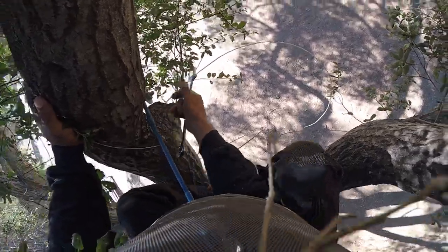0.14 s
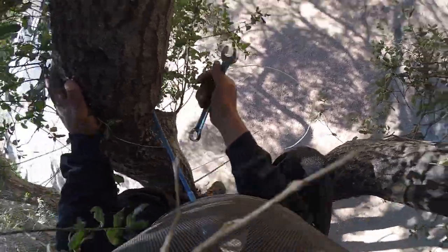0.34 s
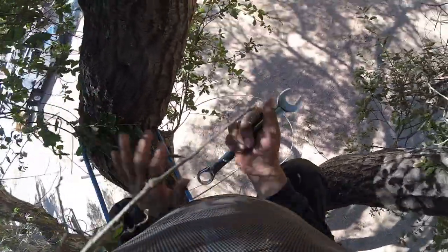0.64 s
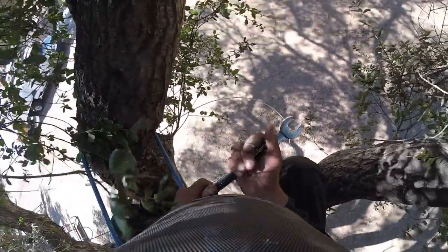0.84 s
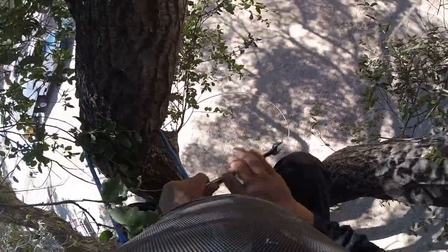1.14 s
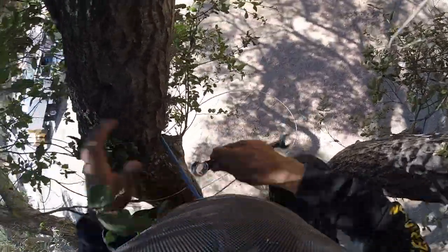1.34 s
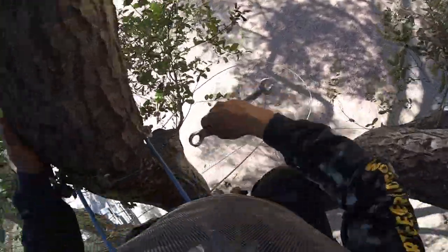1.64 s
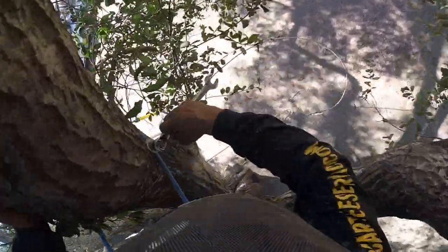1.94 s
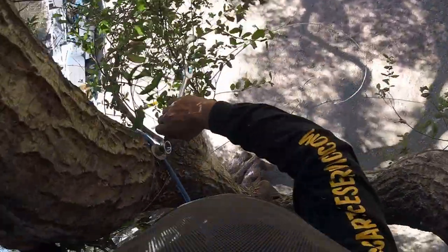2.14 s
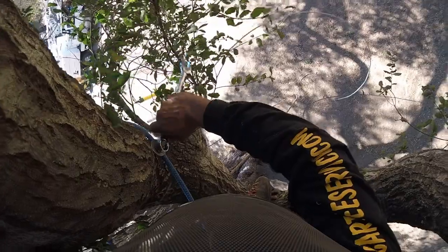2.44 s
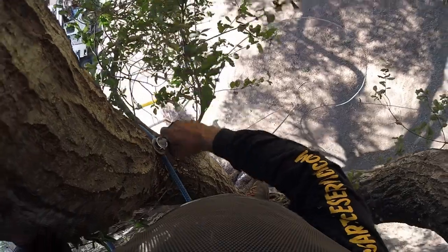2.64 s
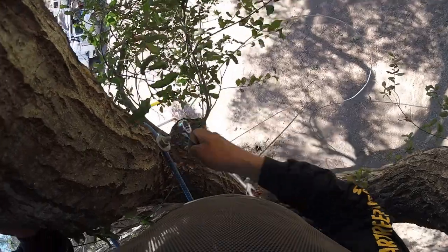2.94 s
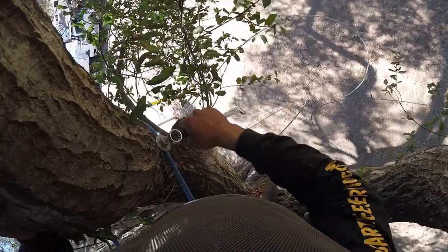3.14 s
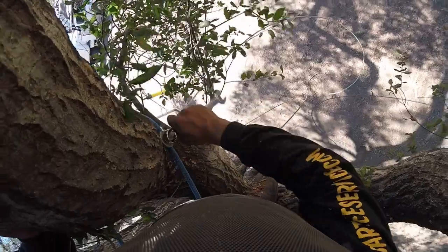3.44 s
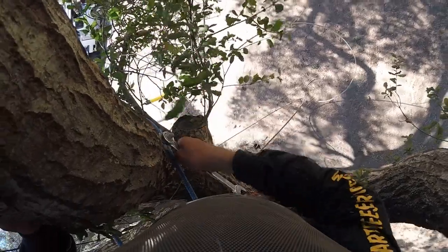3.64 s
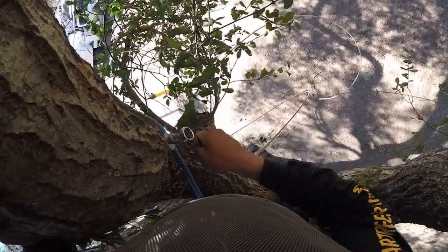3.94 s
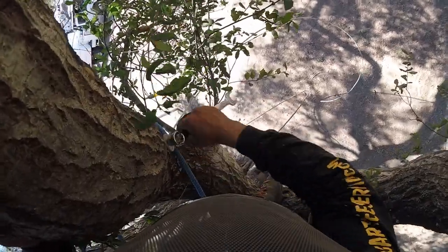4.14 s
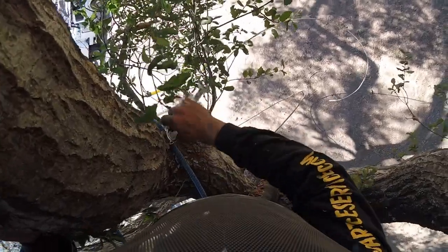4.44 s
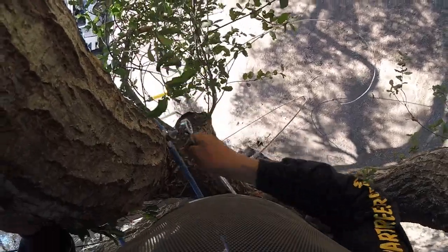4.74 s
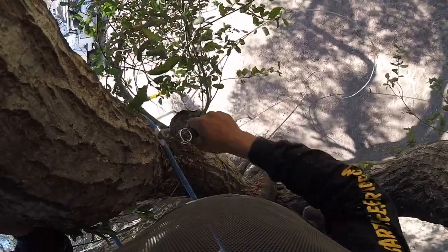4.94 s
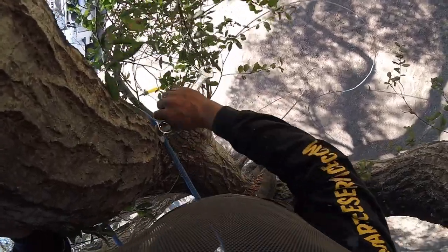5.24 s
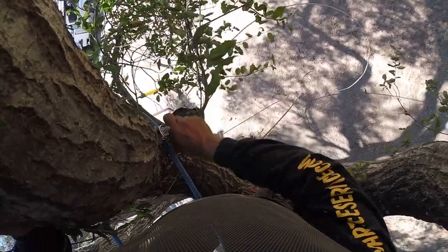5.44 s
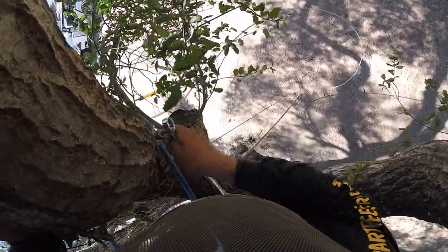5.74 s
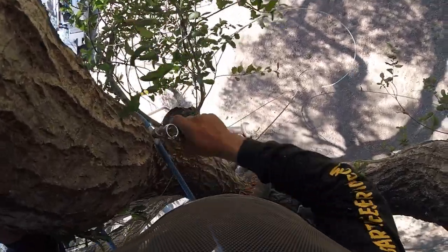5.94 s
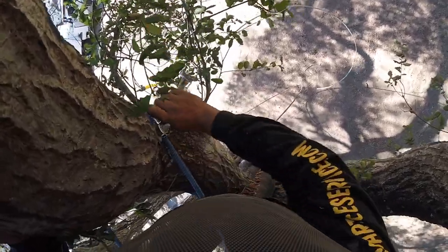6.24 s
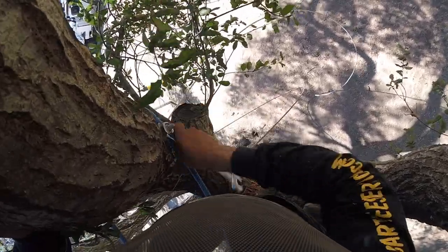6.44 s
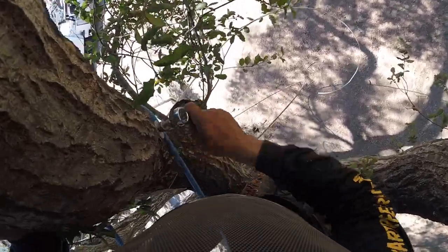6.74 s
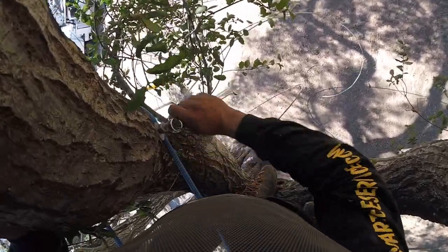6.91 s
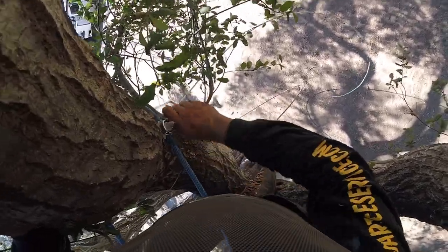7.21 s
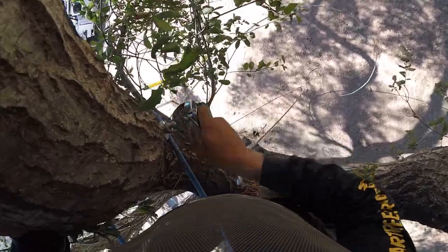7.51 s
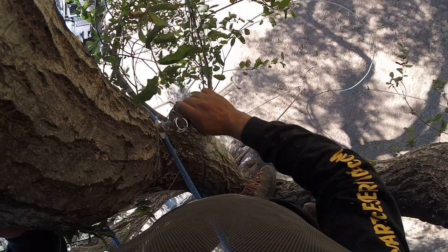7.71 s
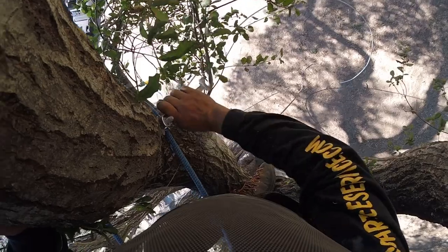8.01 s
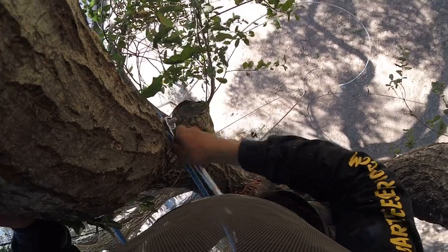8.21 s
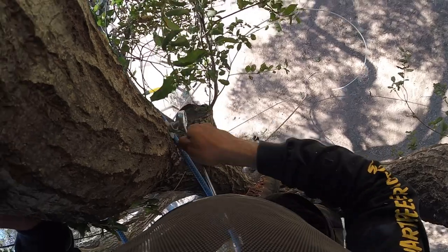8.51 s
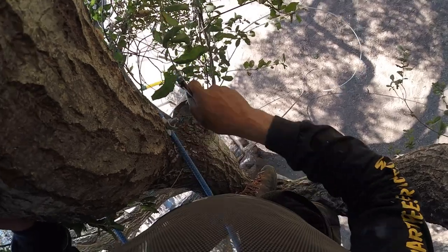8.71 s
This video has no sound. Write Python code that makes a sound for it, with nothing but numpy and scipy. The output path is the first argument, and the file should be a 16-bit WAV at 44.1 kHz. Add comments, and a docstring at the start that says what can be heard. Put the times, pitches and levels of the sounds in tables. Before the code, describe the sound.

Close, dry handling up in a tree: steel ticks first, then twigs and webbing snapping, wood knocking and a low thud. Fabric and rope scuff softly. From around two seconds a spanner clinks and chatters against a bolt in repeating bursts, hard and bright with brief damped rings, small wooden taps beneath. No echo; faint hiss and open air from a chest-worn microphone throughout.

```python
"""High in a tree, a gloved climber turns a steel eye bolt with a spanner, close to a body-worn camera.
The spanner clinks and chatters: bursts of tiny contacts ring its modes. Its free end and the eye sing on.
Snaps are short noise bursts, knocks ring two modes of wood, and bumps are low damped tones.
Cloth, rope and steel rub as noise that swells with each move.
Behind it all lies steady, quiet air and microphone hiss."""
import sys
import numpy as np
from scipy import signal
from scipy.fft import rfft, irfft, next_fast_len
from scipy.io import wavfile
from scipy.ndimage import uniform_filter1d

SR = 44100
rng = np.random.default_rng(int(sys.argv[2]) if len(sys.argv) > 2 else 0)


def digitize_waveform(pressure):
    """Quantize a signal to 16-bit integers and store it at the path in sys.argv[1].

    Rows of a 2-D input are taken as channels; values are limited to [-1, 1].
    """
    field = np.atleast_2d(pressure).T
    bounded = np.clip(field, -1, 1)
    quanta = np.round(bounded * 32767).astype(np.int16)
    wavfile.write(sys.argv[1], SR, quanta)


N = 391166


def clinks():
    """Each blow is a burst of micro-contacts and a looser rattle, ringing the spanner's modes over a broad crack."""
    # steel on steel: (time [s], level [dB], levels of four mode groups, low to high [4 x dB],
    # pitch favoured by the spot struck in each group [4 x Hz], grip's factor on the ring time, chatter time [s])
    steel_blows = [(0.0054, -9, -4.5, -10, -2, -15, 2190, 3600, 5260, 12600, 0.25, 0.004),
                   (0.0147, -9.5, 4.5, -20, -38, -10.5, 2100, 3600, 6500, 10830, 0.18, 0.0025),
                   (0.031, -20, -15, -18, -11, -20, 2190, 4000, 6450, 7000, 0.83, 0.0027),
                   (0.079, -28, -1, -19, -14, -29, 2110, 4150, 5500, 7080, 0.93, 0.002),
                   (1.8535, -29, 3, -11, -31, -28, 2290, 4300, 6280, 7330, 0.75, 0.0071),
                   (1.8724, -31, -4, -9, -30, -31, 2490, 3220, 6360, 9010, 1, 0.0033),
                   (1.9442, -14.5, -4, -16.5, -9, -53, 2236, 3950, 6070, 8080, 0.63, 0.0045),
                   (2.018, -33, -10, 9, -7, -17, 1980, 3950, 6060, 7290, 0.79, 0.0025),
                   (2.041, -7, -14, -8.5, 0.5, -3, 2940, 4180, 5820, 11140, 0.68, 0.0013),
                   (2.187, -15, -9, -10.5, -2, -37.5, 2410, 4250, 6420, 8490, 0.95, 0.0022),
                   (2.1947, -15, -12, -12, -22, -19, 1950, 4250, 6060, 7010, 0.63, 0.0022),
                   (2.4902, -13.5, -10, -10.5, -6, -27, 2480, 4010, 5980, 8530, 0.49, 0.002),
                   (2.7705, -26.5, 7, -29, -28, -18, 2120, 3160, 6370, 7570, 0.19, 0.00098),
                   (2.7873, -26, -1, -5, -22, -31, 2150, 3900, 5980, 7810, 1, 0.0019),
                   (2.7956, -23, 1, -13, -29, -27, 2250, 3930, 6010, 7270, 0.35, 0.0026),
                   (3.2081, -8.5, 3.5, -8, -5.5, -23, 2230, 3720, 5770, 8000, 0.92, 0.002),
                   (3.2191, -8, -26, -10, -9, -18, 2930, 4200, 6050, 8150, 0.4, 0.0017),
                   (3.2414, -35, -13, -17, -8, -26, 2180, 4230, 6400, 8020, 1, 0.0022),
                   (3.2625, -33, -3, -11, -7, -13, 2310, 3750, 5250, 7140, 0.92, 0.0022),
                   (3.277, -11.5, -8.5, -13, -8, -15, 2340, 3280, 6200, 7060, 0.5, 0.0026),
                   (3.3039, -14, -5, -15, -18, -24, 2300, 3960, 6180, 7190, 0.53, 0.0028),
                   (3.3214, -31, -16, -14, -16, -21, 2280, 3230, 6330, 8240, 0.84, 0.0022),
                   (3.453, -30, 17, -2, 3, -3, 2290, 3030, 6020, 8270, 0.89, 0.0022),
                   (3.4828, -9, -8, -22, -11.5, -9.5, 2740, 3820, 6130, 8640, 0.6, 0.002),
                   (3.5093, -9.5, -17, -7, -16, -30, 2210, 4640, 5230, 8260, 0.4, 0.0019),
                   (3.7658, -23.5, 1, -12, -9, -29, 2180, 3140, 5840, 7470, 0.3, 0.0066),
                   (3.7792, -33, 2, -15, -12, -36, 1920, 3130, 6130, 7200, 0.4, 0.0022),
                   (4.025, -10, -9.5, -16.5, -12, -54.5, 2160, 4450, 5960, 8320, 0.75, 0.0027),
                   (4.0308, -10, -33, -7, -7, -33, 2150, 4100, 5860, 8030, 0.47, 0.00069),
                   (4.048, -33, -10, -4, -20, -22, 2200, 4000, 5980, 8010, 1, 0.0028),
                   (4.073, -31.5, 3, -17, -22, -29, 2350, 3000, 6190, 8830, 1, 0.0025),
                   (4.084, -29.5, -2, -16, -20, -29, 2320, 3970, 5990, 7670, 0.9, 0.002),
                   (4.117, -40, -10, -6, -6, -20, 2300, 3900, 6000, 8000, 0.45, 0.0014),
                   (4.124, -28.5, 7, 3, -9, -14, 2830, 3800, 6270, 8390, 0.75, 0.0022),
                   (4.1419, -10, -15, -7, -22, -15, 2350, 3750, 6160, 7630, 0.57, 0.0011),
                   (4.159, -11.5, -3, -11, -6.5, -19, 2330, 3340, 5730, 8090, 0.56, 0.0025),
                   (4.1822, -25.5, -4, -17, -20, -31, 2340, 3840, 5970, 8290, 0.64, 0.002),
                   (4.219, -37, -1, -22, -22, -24, 2210, 3870, 6130, 8280, 0.54, 0.002),
                   (4.3138, -26, 5, -5, -15, -16, 2300, 3970, 6030, 7800, 0.71, 0.0045),
                   (4.326, -5, -3, -15.5, -10, -13, 2460, 3900, 5700, 7870, 0.41, 0.0022),
                   (4.348, -24, -36, -2, -17, -16, 2320, 4680, 6040, 8250, 0.65, 0.0022),
                   (4.511, -41, -11, -12, -18, -27, 2490, 3120, 5710, 8000, 0.91, 0.0027),
                   (4.661, -26, 3.5, -9, -10, -22, 2080, 3140, 6350, 8020, 1, 0.003),
                   (4.688, -18, -16, -11.5, -6.5, -24, 2300, 3750, 6740, 8020, 0.7, 0.0013),
                   (5.0155, -39, -6, -8, -7, -10, 2300, 3900, 6000, 9560, 0.92, 0.0017),
                   (5.0244, -10, -2, -6.5, -17, -12, 2600, 3600, 6440, 7980, 1, 0.0029),
                   (5.0305, -13, 0, -31, -2, -18, 2350, 3730, 6400, 8020, 0.77, 0.0018),
                   (5.048, -28, 1, 2, 6, -9, 2130, 3540, 6300, 8050, 1, 0.0022),
                   (5.08, -13.5, -1, -7, -19, -17, 2330, 4100, 6060, 8050, 0.66, 0.0041),
                   (5.1, -6, -19, -11, -21, -16, 2240, 4070, 6300, 10730, 0.44, 0.0033),
                   (5.124, -23.5, -18, -5, -13, -21, 2150, 3740, 6380, 8290, 0.4, 0.002),
                   (5.1397, -22.5, -1, -8, -18, -34, 2640, 3360, 6100, 7040, 0.68, 0.0016),
                   (5.154, -31, -7, -15, -15, -19, 2750, 3800, 5960, 8180, 1, 0.002),
                   (5.1914, -27, 3, -9, -8, -10, 2200, 3880, 5800, 8460, 0.82, 0.0028),
                   (5.201, -20.5, 2.5, -18, -3, -12, 2300, 3900, 5970, 10560, 1, 0.0018),
                   (5.2082, -18, -13, -19, -18, -26, 2490, 3670, 5700, 8250, 0.46, 0.0014),
                   (5.306, -32, -1, -20, -14.5, -17, 2200, 4150, 6260, 8450, 0.81, 0.0017),
                   (5.374, -23, -6, -5, -11, -17, 2390, 4900, 4950, 7950, 1, 0.0031),
                   (5.382, -19, -4.5, -19, -14, -25, 2420, 3930, 5900, 8250, 0.7, 0.0036),
                   (5.3949, -17.5, -9, -15, -5, -17, 2500, 3600, 6300, 8200, 0.94, 0.002),
                   (5.4178, -20.5, -8, -8, -17, -28, 2900, 4530, 5120, 7060, 0.5, 0.0018),
                   (5.443, -20, -5, -17, -23, -16, 2430, 3150, 6040, 9300, 0.56, 0.0012),
                   (5.551, -32.5, -8, -15, -21, -20, 2190, 3320, 5350, 7060, 0.92, 0.0022),
                   (5.6012, -9, -13, -14, -14, -32, 2920, 3300, 6000, 8520, 0.57, 0.0012),
                   (5.6688, -25.5, 3, -12, -11, -21, 2540, 3930, 5060, 7000, 1, 0.002),
                   (5.6742, -23, 5, 2, 2, -12, 2260, 3080, 5070, 9590, 0.52, 0.0022),
                   (5.698, -10, -6.5, -8, -2, -25, 3000, 3080, 5300, 7530, 0.58, 0.0024),
                   (5.7558, -35, -8, -15, -19, -25, 2210, 2980, 5820, 7430, 0.92, 0.0022),
                   (5.99, -20, 5, -7, -8, -29, 2380, 3770, 6050, 9440, 0.27, 0.0039),
                   (6.012, -34, 10, 16, 7, 6, 2310, 3630, 6000, 8270, 1, 0.0022),
                   (6.039, -8, -32, -15, -15.5, -24.5, 2710, 3544, 5680, 8260, 0.54, 0.0038),
                   (6.0627, -29, -7, -7, -26, -19, 2170, 3770, 5880, 12000, 1, 0.004),
                   (6.0804, -23.5, -12, -7, -13, -25, 2310, 3780, 5930, 8110, 0.63, 0.0021),
                   (6.113, -26, -4, -13, -17, -31, 2340, 3850, 5900, 8430, 0.81, 0.0026),
                   (6.1667, -30, -9, -17, -16, -30, 2130, 4000, 5860, 7070, 1, 0.0022),
                   (6.179, -20, 7, -8, 2, -18, 2320, 3900, 5000, 8090, 1, 0.0036),
                   (6.1906, -6.5, -13, -15.5, -6, -17, 2350, 4030, 6000, 9400, 0.65, 0.0031),
                   (6.212, -29, -5, -11, -22, -15, 2270, 3900, 6030, 8030, 0.78, 0.0022),
                   (6.4656, -16.5, -25, -4, -10, -22, 2130, 3970, 5200, 7540, 1, 0.0089),
                   (6.4717, -7.5, -17, -14.5, -4.5, -21, 2340, 3900, 5910, 8400, 0.51, 0.0022),
                   (6.495, -26, -10, -17, -12, -29, 2120, 3580, 6080, 12600, 1, 0.0025),
                   (6.8706, -9, -9, -7, -22, -30, 2670, 3600, 5170, 7370, 0.84, 0.003),
                   (6.8765, -9.5, -15, -11, -15.5, -33, 2260, 3770, 6170, 8000, 0.51, 0.0025),
                   (6.8924, -24, -14, 0, -18, -35, 2730, 3940, 5530, 8010, 0.6, 0.0022),
                   (6.898, -29, -10, -4, -14, -33, 2730, 3920, 5530, 8010, 0.6, 0.002),
                   (6.916, -38, -20, -2, -22, -33, 2730, 3920, 5530, 8010, 1, 0.0033),
                   (6.9583, -16.5, -15, -7, -17, -28, 2880, 3150, 6050, 8160, 0.35, 0.002),
                   (6.9682, -11.5, -8, -12, -9, -5, 2240, 3290, 6230, 10800, 0.65, 0.0033),
                   (6.9735, -5, -9, -17, -12.5, -21, 2580, 3960, 5900, 9450, 0.28, 0.0017),
                   (6.994, -29, -15, -12, -9, -21, 2670, 3480, 5950, 10500, 1, 0.0022),
                   (7.011, -26.5, -4, -9, -16, -27, 2240, 3270, 6010, 10400, 0.85, 0.0016),
                   (7.021, -42, -10, -10, -10, -7, 2300, 3900, 6000, 10560, 0.6, 0.002),
                   (7.0295, -36, -8, -4, -8, -17, 2480, 3890, 6000, 8140, 1, 0.0018),
                   (7.0436, -7, -7, -19, -6, -6.5, 2340, 3950, 5850, 11500, 0.55, 0.0012),
                   (7.066, -28, -26, 0, -19, -9, 2310, 4770, 5680, 10100, 0.91, 0.0024),
                   (7.281, -44, -12, -6, -23, -17, 2330, 3140, 6340, 8240, 1, 0.0022),
                   (7.3375, -17.5, -9, -14, -14, -19.5, 2350, 3520, 6450, 9600, 0.9, 0.00073),
                   (7.345, -12.5, -23, -8, -13, -24, 2330, 3560, 5370, 8100, 1, 0.0014),
                   (7.363, -22, -7, -13, -16, -31, 2170, 3460, 5730, 8030, 1, 0.0019),
                   (7.7251, -12, -7, -9.5, -12, -28.5, 2790, 3570, 6250, 9400, 1, 0.0043),
                   (7.747, -30, -10, -9, -20, -29, 2620, 3430, 5980, 7150, 1, 0.0022),
                   (7.7961, -10.5, -8, -15.5, -15, -13, 2020, 3720, 6070, 7300, 0.95, 0.0029),
                   (7.8169, -6, -10, -16.5, -17, -13, 2220, 4200, 5900, 8230, 0.31, 0.0032),
                   (7.839, -29, -13, -20, -19, -15, 1950, 3980, 5100, 9000, 1, 0.0024),
                   (7.864, -20, -12, -10, -16, -24, 2170, 4980, 6000, 8180, 1, 0.0034),
                   (7.883, -11, -7, -16, -4, -20, 2320, 4000, 6140, 8180, 1, 0.0026),
                   (7.8926, -9.5, -10.5, -27, -9, -14, 2380, 3980, 5930, 9060, 1, 0.0021),
                   (7.913, -35, -18, -22, -26, 0, 2300, 3760, 6030, 10500, 0.92, 0.0022),
                   (7.936, -41, -15, -17, -10, -17, 2330, 3970, 5370, 7660, 1, 0.0022),
                   (8.2886, -37.5, -3, -3, -21, -21, 2290, 3250, 6070, 7070, 1, 0.002),
                   (8.417, -31, -2, -8, -24, -16, 2320, 3520, 5160, 8330, 1, 0.0025),
                   (8.4253, -22.5, -4, -8, -2, -16, 2760, 3540, 6270, 9600, 0.9, 0.0021),
                   (8.4558, -13, -15, -12, -11, -31.5, 2140, 3440, 5470, 8400, 0.7, 0.0011),
                   (8.47, -30, -21, -11, -17, -21, 2290, 3500, 6300, 8030, 1, 0.0022),
                   (8.4856, -29.5, -13, -7, -13, -28, 2330, 3500, 6360, 8100, 1, 0.0028)]
    # modes of the hand-held spanner: (pitch [Hz], level [dB], time to fall 60 dB before the grip acts [s])
    spanner_modes = [(2166, -17, 0.24), (2322, 0.5, 0.042), (2720, 4.5, 0.015), (3140, 2, 0.034),
                     (3533, 1.5, 0.027), (3800, -8, 0.05), (3962, 4.5, 0.043), (4230, 6.5, 0.017),
                     (4770, -0.5, 0.035), (5270, 12, 0.0053), (6100, 3, 0.044), (6260, -9, 0.067),
                     (7590, -5, 0.023), (8130, -0.5, 0.034), (8890, -2.5, 0.054), (9700, 10.5, 0.015),
                     (10400, 2.5, 0.044), (12640, -4.5, 0.015), (13360, 1, 0.033), (13650, -12, 0.013)]
    # wood round the bolt: (pitch [Hz], level relative to the blow [dB], time to fall 60 dB [s])
    trunk_modes = [(583, -23.5, 0.062), (423, -21.5, 0.033), (905, -1, 0.0036)]
    # upper edges of the three lower mode groups: (pitch [Hz])
    group_tops = [3000, 5000, 7000]
    # centres of the four mode groups: (pitch [Hz])
    group_centres = [2170, 3870, 5700, 8840]
    grip_closes_s, gripped_t60_s = 0.0063, 0.06  # fingers close on the steel soon after a blow
    rattle_db, crack_db = -26.5, -3
    hard_hz, softening = 19100, 0.27  # top of a hard contact; it drops as the top group weakens

    out, t = np.zeros(N), np.arange(3000) / SR
    hz, db, t60 = np.transpose(spanner_modes)
    group = np.searchsorted(group_tops, hz)
    thunk = sum(amp(level - 60 * t / ring_s) * np.sin(2 * np.pi * f * t) for f, level, ring_s in trunk_modes)
    thunk *= 1 - np.exp(-t / 0.00097)
    chances = rng.standard_normal((len(steel_blows), 2, len(hz)))
    noises = rng.standard_normal((len(steel_blows), 3, len(t)))

    for row, (place, detune), (grit, hiss, loose) in zip(steel_blows, chances, noises):
        (s, blow_db), groups_db, favoured, (grip, chatter) = np.split(np.array(row), [2, 6, 10])
        low_db, top_db, loudest_db = groups_db[0], groups_db[-1], max(groups_db)

        # modes far from a favoured pitch are weaker
        distance = abs(np.log2(hz[:, None] / favoured))
        away_octaves = distance.min(axis=1)
        level_db = db + groups_db[group] - np.minimum(80 * away_octaves, 16) + 2.7 * place
        tuned = hz * (1 + 0.0095 * detune)
        tuned[distance.argmin(axis=0)] = favoured  # grip and load bend the nearest mode to it
        decay_db = -60 * t / (np.clip(grip, .2, 6) * t60[:, None])
        decay_db = decay_db - 60 * np.maximum(t - grip_closes_s, 0) / gripped_t60_s
        modes = amp(level_db[:, None] + decay_db) * np.sin(2 * np.pi * tuned[:, None] * t)
        ring = modes.sum(0)

        colour = [(1000, low_db - 6.5), *zip(group_centres, groups_db), (15000, top_db - 34)]
        crack = amp(crack_db + loudest_db - 60 * t / 0.0088) * tinted(hiss, colour)
        crack *= 1 - np.exp(-t / 0.00014)

        contact = 0.17 * grit ** 3 * np.exp(-t / max(chatter, 1e-4))  # cubing makes it spiky
        contact *= 1 - np.exp(-t / 0.00026)  # the edges graze before the full contact
        contact[20] += 1.3  # the full contact
        contact = flattened(contact, 9)  # excites all modes about alike
        contact *= np.exp(-t / max(4 * chatter, 1e-4))
        rebounds = amp(rattle_db) * np.sign(loose) * (abs(loose) > 2.4) * np.exp(-t / 0.016)
        rattle = signal.lfilter([1], [1, -.4], rebounds)  # light rebounds are softer, so duller
        drive = contact / np.linalg.norm(contact) + rattle

        blow = signal.fftconvolve(ring + crack, drive)[:len(t)]
        soft_hz = np.clip(hard_hz * amp(softening * (top_db - loudest_db)), 3000, 20000)
        # a slim bar radiates no bass
        blow = signal.lfilter(*signal.butter(3, [2000, soft_hz], "band", fs=SR), blow)
        add(out, s, amp(blow_db) * (blow / abs(blow).max() + thunk))
    return out


def pings():
    """After some blows the steel swings free, and the spanner's free end rings on in its high modes."""
    # blows that leave it free: (time [s], levels of the six modes [6 x dB])
    free_blows = [(2.0418, -45, -60, -34, -50, -50, -50), (3.2086, -38, -60, -58, -58, -55, -55),
                  (3.2201, -50, -60, -42, -58, -55, -55), (4.029, -34, -66, -70, -70, -70, -70),
                  (4.1584, -32, -60, -58, -58, -50, -50), (4.327, -60, -50, -60, -60, -42, -42),
                  (5.026, -24, -50, -60, -55, -44, -42), (5.032, -60, -60, -48, -60, -55, -50),
                  (5.081, -42, -44, -58, -60, -52, -48), (5.0998, -31, -55, -46, -55, -36, -42),
                  (5.6999, -55, -60, -58, -49, -55, -55), (6.0387, -40, -60, -34, -57, -55, -55),
                  (6.4754, -50, -60, -55, -46, -50, -36), (6.8703, -38, -60, -60, -58, -60, -60),
                  (6.97, -50, -34, -43, -55, -33, -45), (7.0445, -55, -50, -48, -55, -40, -40),
                  (7.7975, -55, -29, -55, -60, -46, -50), (7.818, -40, -55, -40, -60, -39, -48),
                  (7.8935, -55, -55, -55, -50, -44, -23), (8.456, -40, -60, -58, -58, -55, -55)]
    # modes of the free end: (pitch [Hz], time to fall 60 dB [s])
    free_modes = [(8060, 0.047), (9640, 0.051), (12000, 0.089), (12600, .07), (13300, .026), (13800, .025)]
    out = np.zeros(N)
    for (hz, t60), levels in zip(free_modes, np.transpose(free_blows)[1:]):
        table = [(row[0], db, hz, t60) for row, db in zip(free_blows, levels)]
        out += thumps(table, rise_s=0.00064, rough=0)
    return out


def singing():
    """One long-lived mode of the eye, cut short whenever a hand touches it."""
    # the eye set singing: (time [s], level [dB], time to fall 60 dB while free [s], time it rings free [s])
    eye_rings = [(0.017, -18, 0.069, .05), (.04, -51, .5, 0.022), (.078, -45.5, 0.53, .2),
                 (1.95, -60, .6, .07), (2.043, -34, 0.98, 0.052), (2.2, -36.5, .9, 0.026),
                 (2.222, -30.5, 0.13, 0.023), (2.492, -50.5, 0.86, 0.11), (3.21, -35, 0.47, 0.065),
                 (3.279, -30, 0.25, 0.16), (3.77, -47, 0.22, .12), (4.16, -51, .4, 0.045),
                 (4.69, -48, 0.23, .12), (5.102, -54, .9, .1), (5.21, -64, .5, 0.065),
                 (5.42, -60, .2, .015), (5.436, -42, 0.092, .01), (5.604, -58, .3, .03),
                 (5.735, -58, 0.5, .06), (6.042, -51, 0.87, 0.098), (6.473, -42, 0.54, .35),
                 (6.975, -42, 0.34, 0.033), (8.456, -37, 0.26, 0.031)]
    eye_hz, waver_hz = 6530, 11
    rise_s, touched_t60_s = 0.0021, 0.14  # the touch adds its own faster fall

    loudness, t = np.zeros(N), np.arange(SR // 2) / SR
    for s, db, t60, free in eye_rings:
        fall_db = 60 * t / t60 + 60 * np.maximum(t - free, 0) / touched_t60_s
        add(loudness, s, amp(db - fall_db) * (1 - np.exp(-t / rise_s)))
    waver = evened(uniform_filter1d(rng.standard_normal(N), size=4000))  # the load on the bolt shifts
    phase = 2 * np.pi * np.cumsum(eye_hz + waver_hz * waver) / SR
    return np.sqrt(2) * loudness * np.sin(phase)


def knocks():
    """A few gritty contacts in quick succession ring two modes of bark or wood."""
    # dull knocks and short scrapes: (time [s], peak [dB], pitch [Hz], time to fall 60 dB [s],
    # second pitch [Hz], its level relative to the first [dB], scraping time [s])
    wood_knocks = [(0.352, -28.5, 3400, .03, 2700, -8, 0.007), (0.399, -19, 1198, 0.089, 1920, -15, 0.0056),
                   (0.441, -22, 1150, .04, 1800, -13, .004), (0.455, -16, 1060, 0.061, 1790, -2.5, 0.0069),
                   (0.522, -16, 1130, 0.025, 1860, -6.5, 0.013), (0.6, -29.5, 3460, 0.038, 2600, -13, .015),
                   (1.344, -41, 1203, 0.13, 1620, -7, .03), (1.362, -39.5, 3650, 0.075, 3030, -4, 0.017),
                   (1.42, -40, 1105, 0.059, 1720, -8, 0.0087),
                   (1.531, -16.5, 2680, 0.014, 3520, 2.5, 0.0023),
                   (1.552, -28, 1090, 0.096, 3600, -15, .015), (1.744, -18, 1450, 0.044, 3130, -19, 0.0021),
                   (1.816, -33, 1550, 0.043, 2380, -17, 0.0033),
                   (1.886, -29.5, 1355, 0.065, 2410, -5, .008), (1.915, -30, 2420, 0.072, 1410, 7, 0.0059),
                   (1.983, -26.5, 1580, 0.05, 1280, -1, 0.0037),
                   (2.018, -32.5, 1320, 0.13, 1890, -3, 0.0093),
                   (2.106, -30.5, 1580, 0.036, 2620, -10, 0.0043),
                   (2.165, -22.5, 1500, .04, 1180, -4, 0.0044), (2.172, -20.5, 934, 0.069, 1395, 4, 0.01),
                   (2.197, -16.5, 1180, 0.031, 1870, -3, 0.0029),
                   (2.204, -22.5, 534, 0.047, 1290, 1, 0.023),
                   (2.246, -24.5, 1180, 0.068, 1760, -8, 0.0093),
                   (2.27, -18.5, 1240, 0.025, 1680, -4, 0.0044), (2.305, -38, 1250, .06, 1790, -6, .01),
                   (2.324, -32, 1230, 0.044, 1700, -10, .005), (2.41, -31, 596, 0.018, 960, -17, 0.0031),
                   (2.462, -23, 1050, 0.0067, 1870, 2, 0.0033),
                   (2.6199, -16, 1310, 0.044, 1545, -5.5, 0.0028),
                   (3.39, -30, 1175, 0.047, 1760, -5, 0.0081),
                   (3.809, -27.5, 1290, 0.033, 1620, -3, 0.0031),
                   (3.865, -41, 1600, 0.04, 1290, -8, 0.0055), (4.145, -33.5, 750, 0.041, 1210, 7, 0.0057),
                   (4.328, -29, 660, 0.046, 1140, -5, 0.0048), (4.66, -29.5, 562, 0.047, 1250, -9, .006),
                   (4.762, -35.5, 1750, .04, 1400, -6, 0.0074),
                   (4.769, -32, 1216, 0.068, 1820, -15, 0.0062), (4.805, -40.5, 1790, .04, 1300, -2, .008),
                   (5.028, -30, 1000, 0.036, 740, -2, 0.0061), (5.125, -33, 1280, 0.025, 850, -2, 0.0046),
                   (5.14, -28.5, 850, 0.021, 1690, -11, 0.0041),
                   (5.206, -21, 830, 0.016, 1500, -14, 0.0057), (5.386, -29, 1010, 0.016, 1630, -5, 0.0078),
                   (5.42, -33, 1820, 0.027, 705, 5, .005), (5.643, -37, 1570, 0.023, 1100, -6, 0.0034),
                   (5.696, -21, 1330, 0.014, 830, -3.5, 0.0059), (6.195, -33, 686, 0.03, 1110, -9, 0.0097),
                   (6.47, -31, 690, 0.035, 1220, 5, 0.0067), (6.88, -27.5, 780, 0.032, 1280, -2, 0.0077),
                   (7.341, -28.5, 1310, 0.034, 900, -6, 0.0062),
                   (7.726, -32.5, 602, 0.094, 1167, -2, 0.0068),
                   (7.801, -25.5, 1320, 0.021, 960, 1, 0.0046), (7.82, -18.5, 1190, 0.027, 780, -5, 0.0034),
                   (7.89, -25.5, 590, 0.024, 900, -24, .008), (8.456, -24, 814, 0.02, 1410, -5, 0.0041)]
    grit_db = -9

    out, t = np.zeros(N), np.arange(5000) / SR
    grits = rng.standard_normal((len(wood_knocks), len(t)))
    for (s, db, hz, t60, second_hz, second_db, scrape), grit in zip(wood_knocks, grits):
        tones = np.sin(2 * np.pi * hz * t) + amp(second_db) * np.sin(2 * np.pi * second_hz * t)
        ring = tones * amp(-60 * t / max(t60, .005))
        colour = [(0.21 * hz, -24), (hz, 0), (second_hz + hz, -4), (6000, -26)]
        scratch = amp(grit_db - 60 * t / 0.011) * tinted(grit[::-1], colour)

        drive = 0.11 * grit ** 3 * np.exp(-t / max(scrape, 5e-4))
        drive[0] += 0.9  # the first hit
        drive = flattened(drive, 25)  # excites both modes about alike
        drive *= np.exp(-t / max(4.9 * scrape, 5e-4))
        knock = signal.fftconvolve(ring + scratch, drive)[:len(t)]
        add(out, s, amp(db) * knock / abs(knock).max())
    return out


def snaps():
    """Twigs, bark and webbing snap without ringing: short spiky bursts of noise, tilted dull or bright."""
    # snaps: (time [s], level [dB], treble against body [dB], fading time [s])
    dry_snaps = [(0.222, -38, -19, .003), (0.2387, -32, -19, .003), (0.26, -32, -20, 0.0036),
                 (0.2865, -5, -10.5, 0.002), (0.308, -22, -7, 0.0022), (0.337, -20, -20, 0.0027),
                 (0.362, -14, -19, 0.0037), (0.395, -22, -3, 0.0043), (0.419, -21, 5, 0.0028),
                 (0.437, -18, 3, 0.0048), (0.46, -19, 3, 0.004), (0.518, -24, -35, 0.0038),
                 (0.525, -30, -4, 0.0015), (0.586, -22, -2, 0.0027), (0.6, -32, -16, .004),
                 (0.645, -33, -15, .003), (0.686, -28, -20, .004), (0.75, -20, -19, 0.0033),
                 (0.7713, -7.5, -36, 0.0076), (0.781, -11, -8, 0.016), (0.7933, -1, -6, 0.0058),
                 (0.8058, -5.5, -27, 0.002), (0.808, -10, -27, 0.0022), (0.835, -24, -15, 0.0075),
                 (0.856, -26, -7, 0.002), (0.89, -46, -9, 0.003), (0.906, -36, -7, 0.0026),
                 (0.98, -33, -14, 0.005), (1.53, -14.5, 4.5, 0.0022), (1.565, -35, -9, 0.0046),
                 (1.744, -28, -18, 0.0028), (1.545, -26, -11, 0.0037), (1.573, -32, -6, .003),
                 (2.12, -26, -8, .002), (2.155, -16.5, -4, 0.0011), (2.228, -24, -11, .003),
                 (2.381, -17, -13, 0.0022), (2.388, -28, -5, .002), (2.451, -25.5, -3, 0.0049),
                 (2.511, -24, -15, .002), (2.555, -21.5, -6, 0.0022), (2.564, -24, -8, .002),
                 (2.593, -38, -8, .002), (2.62, -32, -16, 0.0029), (3.3793, -6.5, -9, 0.0017),
                 (3.421, -31, 0, .003), (3.431, -27, 2, .004), (3.533, -41, -5, 0.004),
                 (3.698, -29, -37, 0.0028), (5.467, -34, -2, .004), (5.595, -23, -16, .002),
                 (5.633, -46, -5, .003), (8.13, -30.5, -4, 0.0026), (8.725, -29.5, -44, 0.015)]
    out, t = np.zeros(N), np.arange(1500) / SR
    noises = rng.standard_normal((len(dry_snaps), len(t)))
    for (s, db, treble_db, length), noise in zip(dry_snaps, noises):
        colour = [(300, -38), (1200, 3.0), (3000, -3.0), (7000, treble_db), (15000, treble_db - 25.0)]
        burst = tinted(noise * abs(noise), colour)
        burst = burst * np.exp(-t / max(length, 2e-4))
        add(out, s, amp(db - 3.0) * burst / abs(burst).max())  # peaks 3 dB under the listed level
    return out


def bumps():
    """Soft bumps carried through the harness, heard as low damped tones."""
    # bumps: (time [s], level [dB], pitch [Hz], time to fall 60 dB [s])
    harness_bumps = [(0.287, -13, 363, 0.096), (0.519, -27, 142, 0.085), (0.811, 1, 144, 0.035),
                     (0.837, -8.5, 301, 0.13), (0.868, -28.5, 311, 0.37), (0.984, -25, 350, 0.14),
                     (1.035, -31, 345, 0.16), (1.383, -28, 298, 0.084), (1.741, -28, 384, 0.17),
                     (1.941, -31.5, 348, 0.17), (2.041, -34, 278, 0.087), (2.193, -27, 291, 0.18),
                     (2.492, -25.5, 205, 0.039), (2.784, -25.5, 201, 0.13), (3.205, -20, 203, 0.036),
                     (3.27, -24.5, 278, 0.054), (3.484, -22.5, 222, 0.063), (4.024, -32.5, 205, 0.091),
                     (4.12, -33, 161, 0.055), (4.325, -17.5, 253, 0.027), (4.5155, -14.5, 340, 0.022),
                     (4.66, -20, 205, 0.016), (5.098, -31, 204, 0.34), (5.379, -24, 167, 0.057),
                     (5.591, -18.5, 151, 0.045), (5.64, -25.5, 211, 0.076), (6.079, -20.5, 217, 0.048),
                     (6.189, -22, 280, 0.055), (6.4645, -5.5, 303, 0.023), (6.466, -24, 191, 0.074),
                     (6.97, -21, 256, 0.073), (7.042, -21, 255, 0.033), (7.334, -0.5, 179, 0.009),
                     (7.815, -21, 208, 0.045), (8.2895, -17, 240, 0.022), (8.457, -26, 403, 0.068)]
    return thumps(harness_bumps, rise_s=0.0035, rough=0.47)


def thumps(table, rise_s, rough):
    """A damped tone with a soft start; rough sets the share of a neighbour tone above it."""
    out, t = np.zeros(N), np.arange(6000) / SR
    for (s, db, hz, t60), ratio in zip(table, rng.uniform(1.056, 1.35, len(table))):
        tone = np.sin(2 * np.pi * hz * t) + rough * np.sin(2 * np.pi * hz * ratio * t)
        add(out, s, amp(db - 60 * t / max(t60, .005)) * tone * (1 - np.exp(-t / rise_s)))
    return out


def moves():
    """Rubbing shakes the low resonances of mount and chest; rope scuffs, steel scrapes and cloth rustles above."""
    # hollow camera mount: (pitch [Hz], width [Hz], relative level [dB])
    mount_modes = [(330, 19, 12), (372, 156, 2)]
    # harness and chest: (pitch [Hz], width [Hz], relative level [dB])
    chest_modes = [(150, 18.3, -8), (200, 32, -23.5)]
    # rope scuffing, spectrum shape: (pitch [Hz], relative level [dB])
    scuff_colour = [(260, 6.5), (450, -4.5), (491, 7), (611, 5), (712, 4.5), (1140, 1), (2200, -20),
                    (2860, -67), (4840, -120)]
    # steel on bark, spectrum shape: (pitch [Hz], relative level [dB])
    scrape_colour = [(880, -8), (1500, 2.5), (1620, 1), (1840, -1.5), (3040, -3), (3320, -8), (5000, -25),
                     (6500, -16), (11000, -120)]
    # cloth rustling, spectrum shape: (pitch [Hz], relative level [dB])
    rustle_colour = [(2350, -2), (4000, 2.5), (5560, -2), (6020, -1), (10400, -10), (14500, -33),
                     (15500, -45)]

    mount = patchy(humps(mount_modes), size=1024, patch_db=1.0, flicker_db=1.0)
    chest = patchy(humps(chest_modes), size=1024, patch_db=3.0, flicker_db=1.0)
    scuff = patchy(scuff_colour, size=512, patch_db=2.0, flicker_db=1.54)
    scuff = scuff + 0.35 * catches(scuff_colour, 120, spread_db=8.5)
    scrape = patchy(scrape_colour, size=512, patch_db=4.5, flicker_db=2.0)
    scrape = scrape + 0.42 * catches(scrape_colour, 130, spread_db=4.5)
    rustle = patchy(rustle_colour, size=256, patch_db=2.5, flicker_db=1.0)
    rustle = rustle + 0.6 * catches(rustle_colour, 87, spread_db=6.0)
    return (efforts() * [mount, chest, scuff, scrape, rustle]).sum(0)


def efforts():
    """Gain of the five rubbing layers: each move rises, holds and dies away over the idle level."""
    # cloth and rope moving: (start [s], length [s], mount level [dB], chest level [dB], rubbing level [dB],
    # treble relative to rubbing [dB])
    rub_moves = [(0, 0.038, -37.5, -32, -38.5, -5), (0.077, 0.11, -46, -47, -38, -12),
                 (0.188, 0.086, -38, -36, -35.5, -30), (0.258, 0.033, -25, -25, -22, -24),
                 (0.315, 0.082, -33, -26.5, -28, -19.5), (0.406, 0.067, -31.5, -30.5, -32.5, -9),
                 (0.495, 0.063, -34.5, -28, -37, -4), (0.578, 0.1, -24, -33, -29.5, -14),
                 (0.675, 0.12, -25, -38, -22.5, -22), (0.778, 0.078, -26, -49, -34.5, -25),
                 (0.866, 0.063, -35, -45, -59, 5), (0.95, 0.064, -31.5, -43, -60, 5.5),
                 (1.295, 0.13, -40.5, -54, -51, -0.5), (1.414, 0.069, -37, -40, -46, -7),
                 (1.485, 0.093, -40, -48, -43, -6.5), (1.604, 0.11, -51, -55, -50, -12),
                 (1.724, 0.073, -44, -45, -44, -14), (1.8, 0.27, -48.5, -64, -45.5, -9.5),
                 (2.02, 0.19, -57, -47, -57.5, 7), (2.15, 0.17, -48.5, -59, -44.5, -6.5),
                 (2.358, 0.29, -52.5, -70, -47, -4), (2.67, 0.21, -53.5, -61, -48.5, -9.5),
                 (3.237, 0.083, -44.5, -48, -39.5, -11), (3.312, 0.24, -49, -52, -50, -1),
                 (3.7, 0.19, -72, -61, -46.5, -15.5), (4.126, 0.069, -46, -47, -41.5, -24),
                 (4.486, 0.26, -61, -55, -51.5, -24), (5.06, 0.1, -56, -43.5, -49.5, -2),
                 (5.173, 0.059, -38.5, -35, -45.5, -4.5), (5.346, 0.079, -38, -39, -43, -7.5),
                 (5.524, 0.22, -46, -58, -49.5, -7.5), (5.848, 0.083, -64, -56, -45.5, -16.5),
                 (5.976, 0.33, -53, -46, -46, -16), (6.358, 0.085, -57, -56, -45, -17),
                 (6.403, 0.12, -60, -40, -45, -9), (6.588, 0.062, -60, -58, -43.5, -15.5),
                 (6.94, 0.096, -52, -39, -43, -13), (7.323, 0.02, -31, -53, -32, -16),
                 (7.796, 0.11, -40.5, -39, -44.5, -25), (8.037, 0.21, -68, -60, -48, -14),
                 (8.258, 0.3, -55.5, -65, -48.5, -15), (8.62, 0.19, -47.5, -70, -52.5, -16)]
    # small shifts of weight between moves: (mount, chest, scuff, scrape, rustle level [dB])
    idle_levels = [-66.5, -50, -56, -63.5, -64.5]
    rise_s, fall_t60_s = 0.026, 0.17
    lead_share = 0.23  # of the length: long moves swell in slowly

    power, t = amp(idle_levels)[:, None] ** 2 * np.ones(N), np.arange(SR) / SR
    for s, length, mount_db, chest_db, rub_db, treble_db in rub_moves:
        lead = min(s, lead_share * length)
        swell = np.minimum(t / (rise_s + lead), 1) ** 2
        shape = swell * amp(-60 * np.maximum(t - lead - length, 0) / fall_t60_s)
        scrape_db = rub_db + 0.5 * treble_db  # the scrape half follows the treble
        for layer, db in zip(power, [mount_db, chest_db, rub_db, scrape_db, rub_db + treble_db]):
            add(layer, s - lead, (amp(db) * shape) ** 2)
    return np.sqrt(power)


def patchy(points, size, patch_db, flicker_db):
    """Noise whose level wanders in small patches of time and pitch and flickers across the whole band."""
    frames, hz = 4 * N // size + 5, np.fft.rfftfreq(size, 1 / SR)
    real, imaginary, patches = rng.standard_normal((frames, len(hz), 3)).T
    patches = uniform_filter1d(patches, size=5, axis=0)  # over pitch
    patches = evened(uniform_filter1d(patches, size=8, axis=1))  # over time
    flicker = evened(uniform_filter1d(rng.exponential(1, frames) - 1, size=3))
    level_db = read(points, hz)[:, None] + patch_db * patches + flicker_db * flicker
    grid = (real + 1j * imaginary) * amp(level_db)
    return evened(signal.istft(grid, nperseg=size, noverlap=3 * size // 4)[1][:N])


def catches(points, per_s, spread_db):
    """Sparse ticks of uneven size, as fibres and bark catch and let go."""
    sizes = amp(spread_db * np.minimum(rng.exponential(1, N), 2.5))
    ticks = sizes * (rng.random(N) < per_s / SR)
    fading = signal.lfilter([1], [1, -.975], ticks)  # each tick dies away in about a millisecond
    return tinted(fading * rng.standard_normal(N), points)


def humps(modes):
    """Spectrum table of a few resonances, each a peak of given pitch, width and level."""
    hz = np.geomspace(60, 1500, num=80)
    height = sum(amp(db) / (1 + (2 * (hz - f) / width) ** 2) for f, width, db in modes)
    return np.transpose([hz, 20 * np.log10(height)])


def air():
    """Quiet outdoor air and microphone hiss: steady noise, shaped by a spectrum."""
    # spectrum shape: (pitch [Hz], relative level [dB])
    air_colour = [(20, -18), (50, -15), (105, -22), (135, -9), (200, -2), (400, -1), (1000, -12),
                  (2500, -16), (5200, -38), (6000, -26), (6500, -20), (9000, -20), (13000, -31.5),
                  (15500, -35)]
    return amp(-51) * tinted(rng.standard_normal(N), air_colour)


def amp(db):
    """Turns decibels into a plain gain."""
    return 10 ** (np.asarray(db) / 20)


def evened(x):
    """Scales a signal to an average (RMS) level of one."""
    return x / np.sqrt(np.mean(x ** 2) + 1e-20)


def add(mix, s, sound):
    """Mixes a sound in at a time in seconds, in place."""
    part = mix[round(s * SR):][:len(sound)]
    part += sound[:len(part)]


def read(points, hz):
    """Reads a spectrum table at any pitch, along a logarithmic pitch scale."""
    f, value = np.transpose(points)
    return np.interp(np.log(hz + 1), np.log(f + 1), value)


def tinted(x, points):
    """Multiplies the spectrum of x by a table's shape, then evens the level."""
    size = next_fast_len(len(x))
    gain = amp(read(points, np.fft.rfftfreq(size, 1 / SR)))
    return evened(irfft(rfft(x, size) * gain, size)[:len(x)])


def flattened(x, size):
    """Evens out the spectrum, dividing by its strength averaged over size neighbouring bins."""
    spectrum = rfft(x)
    return irfft(spectrum / np.sqrt(uniform_filter1d(abs(spectrum) ** 2, size=size)), len(x))


def scene():
    """Mixes steel, wood and rubbing through the camera's wind filter, then adds the air."""
    steel = clinks() + pings() + singing()
    wood = snaps() + knocks() + bumps()
    handled = steel + wood + moves()
    wind_filter = signal.butter(12, 145.4, "high", fs=SR, output="sos")  # takes away the deep bass
    return (signal.sosfilt(wind_filter, handled) + air())[None]


def record(dry):
    """The microphone rolls off the highest treble; then a steep filter limits the band."""
    soft = signal.sosfilt(signal.butter(6, 14800, fs=SR, output="sos"), dry)
    band_limit = signal.firwin(511, 16200, window=("kaiser", 9), fs=SR)
    return signal.oaconvolve(soft, band_limit[None], "same")


dry = scene()
out = record(dry)
digitize_waveform(out)
```